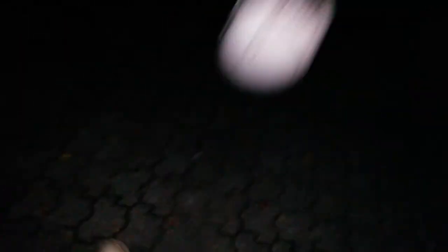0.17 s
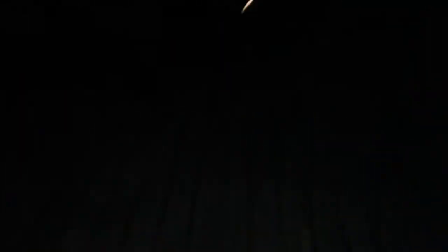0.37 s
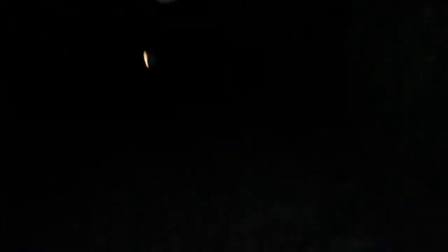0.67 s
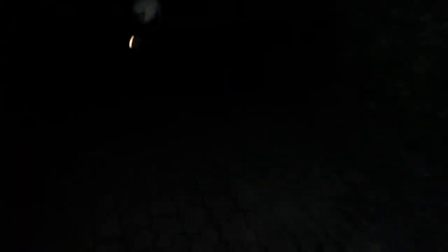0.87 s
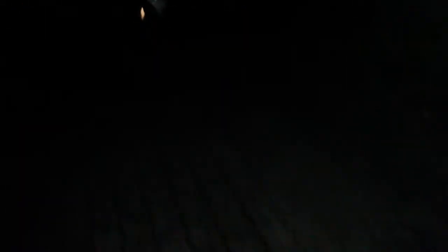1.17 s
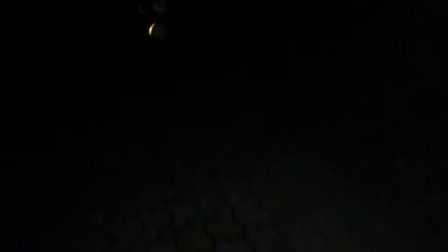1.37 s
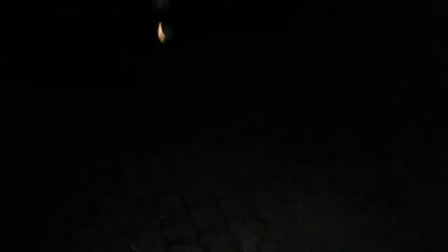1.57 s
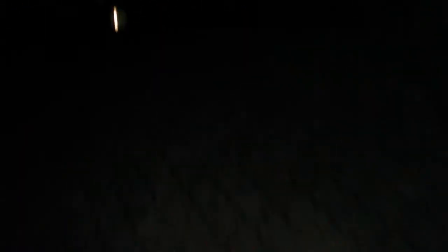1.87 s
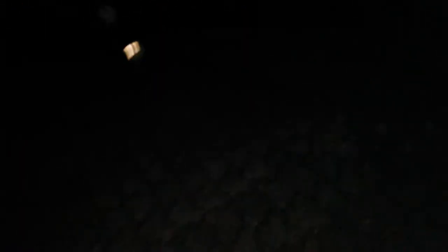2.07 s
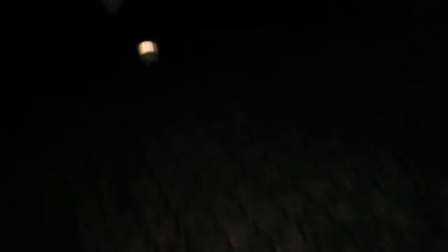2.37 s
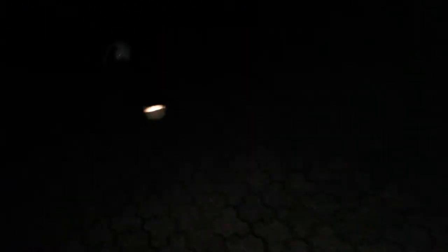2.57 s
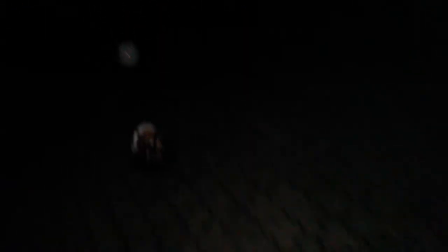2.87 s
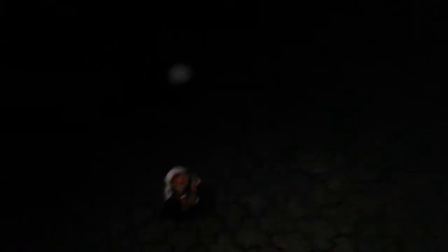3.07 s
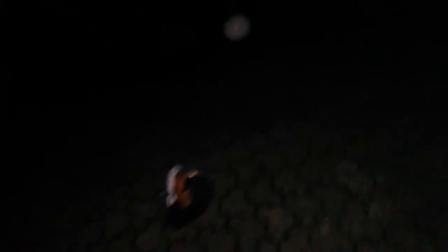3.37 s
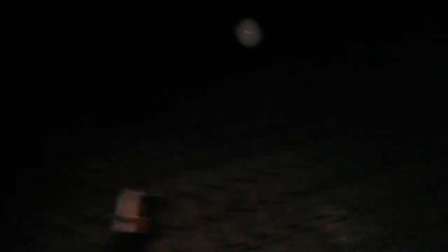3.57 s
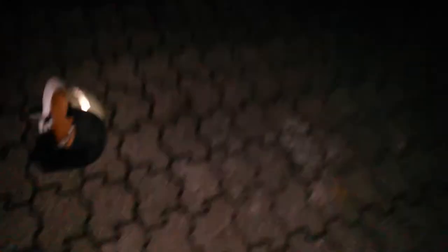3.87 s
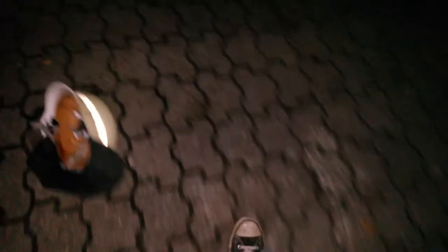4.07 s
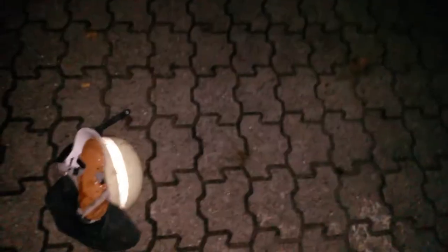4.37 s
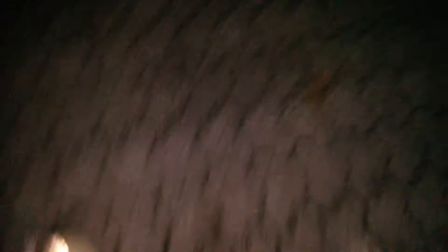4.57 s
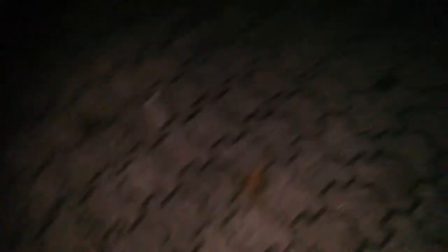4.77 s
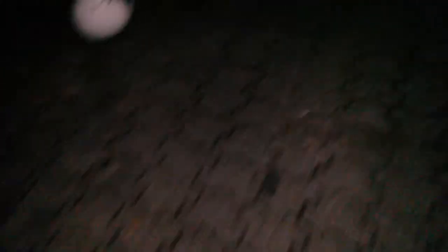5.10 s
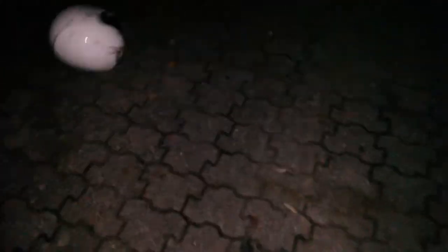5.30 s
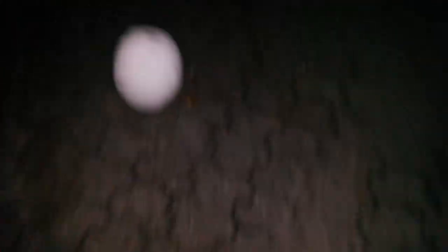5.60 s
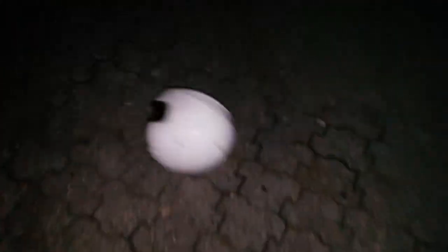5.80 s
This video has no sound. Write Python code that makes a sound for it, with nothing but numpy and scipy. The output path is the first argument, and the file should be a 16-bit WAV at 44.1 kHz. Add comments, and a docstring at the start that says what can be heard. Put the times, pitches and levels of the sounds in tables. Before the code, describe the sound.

Hollow hard-shell helmets are kicked over stone paving, knocking, clacking and crunching grit, with scuffing shoes and dry scrapes outdoors at close range.

```python
"""Helmets kicked over stone paving

Shoes and hard plastic shells strike stone close to a hand-held camera: decaying modes give thump and
knock, band-passed grit bursts give clack and crunch. Filtered grains make scuffs, slides and ticks.
A metal fitting rings twice as a sum of sines; air buffets the microphone as low noise.
A nearby wall slaps back as decaying noise; the right port is brighter, with a treble resonance."""
import sys
import numpy as np
from scipy import signal
from scipy.fft import rfft, irfft, next_fast_len
from scipy.io import wavfile
from scipy.ndimage import map_coordinates

SR = 44100
rng = np.random.default_rng(int(sys.argv[2]) if len(sys.argv) > 2 else 0)


def to_wav(sig):
    """Store sig (one row per channel, or 1-D mono) as 16-bit WAV at the path in sys.argv[1].

    Samples outside -1..1 are clipped; the rate is SR.
    """
    pcm = np.clip(np.atleast_2d(sig), -1, 1) * 32767
    pcm = np.round(pcm).astype(np.int16)
    wavfile.write(sys.argv[1], SR, pcm.T)  # frames by channels


N = 261954

# sliding and rolling of a shell: t/s, rumble level/dB, grit level/dB
SLIDE = [(0.0, -55, -33.5), (0.1, -69, -67), (0.86, -74, -77), (1.02, -58, -47.5), (1.21, -61.5, -53.5),
         (1.52, -69, -61.5), (1.7, -77, -65.5), (2.07, -62.5, -60), (2.55, -64, -53.5),
         (2.81, -55.5, -54.5), (3.14, -61.5, -55), (3.72, -59.5, -53), (4.5, -52, -47.5), (5.13, -53, -51),
         (5.43, -55.5, -52), (5.66, -59.5, -46), (5.82, -54, -38), (5.94, -63, -59)]
# air on the moving camera: t/s, level/dB
BUFFET = [(0, -44.5), (.5, -59.5), (3, -62.5), (3.7, -52.5), (5.94, -55)]
# short low swells, some giving the thumps their deepest boom: t/s, level/dB
SWELLS = [(.08, -43), (1.01, -56), (1.52, -56.5), (1.79, -50), (2.6, -61), (4.15, -51), (5.01, -38.5)]
# placed bumps over paver joints: t/s, level/dB
BUMPS = [(2.933, -47.5), (3.341, -47), (3.656, -45), (4.207, -48), (4.77, -43), (4.84, -44), (4.894, -41),
         (4.937, -36.5)]
# full blows of shoes and shells on stone: t/s, thump level/dB, knock level/dB, knock f/Hz,
# clack level/dB, clack f/Hz, grit level/dB, crunch t60/s
BLOWS = [(0.0198, -67, -39, 350, -48, 2400, -35.5, 0.043), (0.276, -55, -30, 551, -32, 1500, -21, 0.043),
         (0.3334, -47.5, -28.5, 724, -46, 1260, -45, .012),
         (0.8509, -40.5, -28, 496, -40, 2830, -35, 0.055), (0.9857, -30, -24, 460, -28.5, 3350, -19, 0.048),
         (1.2763, -42, -31, 413, -38, 1480, -23.5, 0.037),
         (1.7531, -33, -35.5, 443, -38.5, 1330, -41.5, 0.034),
         (1.774, -44, -45, 368, -42.5, 2450, -34, .026),
         (1.9335, -40, -32.5, 473, -36.5, 3270, -36.5, 0.034),
         (2.152, -38.5, -31, 938, -28.5, 3480, -29, 0.0059),
         (2.2854, -37.5, -42.5, 614, -41, 2880, -40.5, .009),
         (2.587, -34.5, -34.5, 545, -35.5, 1440, -31.5, 0.067),
         (2.6605, -62, -38, 476, -21, 1560, -21.5, 0.014), (2.718, -38.5, -25, 503, -30.5, 2300, -43, .011),
         (2.7482, -39, -32.5, 323, -28, 3500, -40.5, 0.012), (3.0923, -45, -43, 597, -54, 1740, -59, .03),
         (3.4132, -37, -32, 482, -32.5, 1950, -46, 0.012), (3.577, -44, -40.5, 685, -32, 3200, -31, 0.01),
         (3.8791, -47, -37, 323, -57, 1300, -43, .01), (4.1505, -46, -38, 328, -54, 1990, -59, .07),
         (4.2754, -40.5, -34.5, 303, -43.5, 1260, -48, 0.044),
         (4.3494, -54, -42, 654, -51, 1260, -52, 0.033), (4.371, -46, -52, 586, -40, 1260, -35, 0.066),
         (4.388, -44, -43.5, 593, -39.5, 1500, -31, 0.015),
         (4.5237, -40, -34.5, 814, -37.5, 1420, -43, 0.046),
         (4.5321, -40, -32.5, 1110, -31, 1500, -48, 0.053),
         (4.576, -38, -44, 317, -36.5, 1330, -24.5, 0.017), (4.6195, -41, -39, 575, -33, 1370, -42, 0.048),
         (4.6636, -35.5, -34, 373, -36, 3420, -38.5, .01),
         (4.6784, -35.5, -32.5, 330, -47, 1300, -42, 0.017),
         (5.1972, -41, -42, 566, -36, 1460, -32.5, 0.024), (5.2127, -45, -34, 776, -32, 1440, -52, 0.022),
         (5.2193, -40, -37, 307, -40.5, 3380, -36, .047), (5.277, -44, -44, 345, -49, 1370, -54, .1)]
# rim clacks of a tumbling shell: t/s, clack level/dB, clack f/Hz, grit level/dB
CLACKS = [(0.0546, -38.5, 1480, -31), (0.3761, -34, 2660, -31.5), (0.4027, -41, 1930, -40),
          (0.4314, -32, 2300, -29), (2.4404, -44, 1330, -54), (3.0392, -40.5, 2320, -40),
          (3.1777, -44.5, 1670, -47.5), (3.261, -55, 2970, -40), (3.4702, -52, 2570, -47),
          (3.5466, -43, 1810, -38.5), (3.8731, -38, 2750, -39), (4.984, -41.5, 2140, -39.5),
          (5.166, -40, 3070, -42), (5.3225, -37, 1720, -47), (5.6443, -42, 2490, -39.5),
          (5.8993, -24, 2650, -21)]
# placed single grains: t/s, level/dB
TICKS = [(0.0839, -44), (0.697, -54), (2.0597, -44), (2.0812, -42.5), (2.528, -46.5), (3.129, -44),
         (3.6437, -47.5), (5.469, -41.5)]
# short scuffs on the paving: t/s, rasp level/dB, hiss level/dB
SCUFFS = [(0.128, -35, -32), (1.012, -36.5, -40), (1.298, -36, -41), (1.492, -51, -42.5),
          (1.884, -65, -29.5), (2.151, -46, -31), (2.171, -30, -32), (2.687, -32.5, -27),
          (2.922, -43.5, -20.5), (3.348, -39.5, -24), (4.069, -39, -40), (4.47, -44, -50),
          (4.538, -36, -26.5), (5.02, -41, -48), (5.073, -55, -27.5), (5.732, -31.5, -21.5),
          (5.826, -38.5, -27.5), (5.926, -33, -44)]
# grit bursting under a shell or sole: t/s, crack level/dB, crack f/Hz
CRACKS = [(2.174, -33, 4200), (2.8508, -30.5, 4460), (2.956, -26.5, 5410), (4.0448, -38, 5770),
          (4.0942, -39, 3700), (4.113, -34, 3950), (4.7292, -29.5, 4220), (4.8585, -41, 5780),
          (5.0041, -42, 5160), (5.0463, -32.5, 4240), (5.0497, -24, 4330), (5.0925, -25, 3550),
          (5.1147, -38, 6280), (5.127, -32, 4980), (5.1401, -30.5, 4000), (5.8946, -25, 5940)]
# landings that ring the fitting: t/s, level/dB
RINGS = [(2.66, -26), (2.9569, -24.5)]
# modes of the metal fitting: f/Hz, level/dB, t60/s
FITTING = [(1475, -4, .08), (1560, -9, .05), (2681, 0, .115), (2770, -8, .06), (4829, -20, .08),
           (5110, -11, .06), (7036, -17, .08), (9250, -12, .1), (10600, -13, .12)]
# nominal modes of the hollow knock: frequency ratio, level/dB, cycles to fade by 60 dB
HOLLOW = [(.66, -16.5, 23), (1, -0.5, 21.5), (1.3, -3.5, 15), (1.66, -5.5, 20.5), (2.2, 2, 4.5)]
# nominal modes of the dull thump: f/Hz, level/dB, t60/s
THUMP = [(127, -8.5, 0.054), (183, -2.5, 0.041), (266.6, -0.5, 0.067)]
# filter spectra of rumble, rasp, hiss and air: f/Hz, gain/dB
RUMBLE = [(60, -30), (150, -2), (220, -4), (280, -2.5), (400, -7), (600, -7), (1000, -13.5), (1600, -27),
          (4000, -89)]
RASP = [(500, -17), (1100, 4.5), (1600, 4), (2200, 5), (3600, 4.5), (5500, 2.5), (7000, 4.5),
        (10000, -15.5)]
HISS = [(3500, -34.5), (7000, -5.5), (9000, -3.5), (12000, -6), (16000, 0.5)]
AIR = [(10, -19), (30, -9.5), (65, 1), (110, -4), (200, -15), (600, -29)]
# microphone port responses: f/Hz, gain/dB
LEFT_PORT = [(60, -2.5), (200, -1.5), (400, -7), (700, -5.5), (1300, -2.5), (2400, -4), (4400, -3.5),
             (6200, -2), (8500, -11.5), (10900, -12.5), (12500, -15.5), (15500, -16.5)]
RIGHT_PORT = [(60, 1), (7000, -0.5), (9300, 3), (10900, 12.5), (12500, 2.5), (14500, -4), (16000, -10)]
# decay of the yard's long tail: f/Hz, t60/s
YARD = [(100, 0.5), (400, 0.94), (1500, 0.84), (5000, 0.71), (11000, 0.58), (16000, 0.44)]

ROLL_DB, RASP_DB, HISS_DB = 4, -3, 2.5  # roll re rumble; rasp and hiss re grit
SWELL_HALF_S = 0.019
BUMPS_PER_S, BUMP_DB, BUMP_HZ = 9, 5, 275.6  # random bumps, dB re rumble; nominal pitch of all bumps
TICKS_PER_S, TICK_DB = 11, -4.5  # random grains, dB re grit
SCATTER_DB = 6.5  # size spread of random bumps and ticks: twice the logistic scale
CRACK_DB, CRACK_GRIT_SHARE = -1, 0.44  # offset; share of the way from clack level to grit level
RIM_KNOCK_HZ, RIM_KNOCK_DB, RIM_THUMP_DB = 694, -12.5, -20.5  # dB re clack
RIM_CRACK_DB, RIM_T60_S = -5.5, 0.024  # the light rim cracks the stone more softly
SCUFF_RISE_S, SCUFF_T60_S = 0.01, 0.062  # rise of 20 dB; fall of 60 dB
GRIT_SNAP_DB, GRIT_CLACK_DB, GRIT_KNOCK_DB, GRIT_THUMP_DB = 0.5, -16.5, -19, -24  # dB re crack
GRIT_HZ, GRIT_KNOCK_HZ, GRIT_CLACK_HZ, GRIT_T60_S = 4510, 380.5, 2540, 0.02
TOP_HZ = 16200


def amp(db):
    """Decibels to gain."""
    return 10 ** (np.asarray(db) / 20)


def unit(x):
    """Scale to rms 1."""
    return x / np.sqrt(np.mean(x ** 2) + 1e-20)


def pulse(x):
    """Scale to the energy of 10 ms at rms 1."""
    return x * np.sqrt(SR / 100 / (np.sum(x ** 2) + 1e-20))


def along(points, hz):
    """Interpolate (Hz, value) points on a log frequency axis."""
    f, v = np.transpose(points)
    return np.interp(np.log(hz + 1), np.log(f + 1), v)


def curves(rows):
    """One value per sample for each column after the time."""
    s, *cols = np.transpose(rows)
    return [np.interp(np.arange(N) / SR, s, c) for c in cols]


def wobble(knots_per_s):
    """Smooth random curve: a spline through normal draws."""
    knots = rng.standard_normal(int(N * knots_per_s / SR) + 4)
    return map_coordinates(knots, [np.arange(N) * knots_per_s / SR])


def colour(x, points):
    """Minimum-phase filter with the gain of (Hz, dB) points."""
    m = 2 * next_fast_len(len(x) // 2 + 4096)
    log_gain = np.log(amp(along(points, np.fft.rfftfreq(m, 1 / SR))))
    cepstrum = irfft(log_gain, m)
    # fold onto positive time: causal
    cepstrum[1:m // 2] *= 2
    cepstrum[m // 2 + 1:] = 0
    response = np.exp(rfft(cepstrum))
    return irfft(rfft(x, m) * response, m)[:len(x)]


def band(x, lo_hz, hi_hz, order=2):
    """Causal Butterworth band-pass."""
    edges_hz = np.clip(sorted([lo_hz, hi_hz]), 10, SR / 2 - 100)
    return signal.lfilter(*signal.butter(order, edges_hz, 'band', fs=SR), x)


def add(track, s, x):
    """Mix x into the track at time s."""
    i = max(0, round(s * SR))
    track[i:i + len(x)] += x[:max(0, len(track) - i)]


def late(x, s):
    """Delay by s seconds."""
    return np.pad(x, (max(0, round(s * SR)), 0))[:N]


def chance(rate_per_s, level_db):
    """(s, dB) of random small events whose size follows a level curve."""
    draws = rng.random((round(rate_per_s * N / SR), 2))
    return [(u * N / SR, level_db[int(u * N)] + SCATTER_DB * np.log(v / (1 - v)) / 2)
            for u, v in draws]


def grains(size, rate_per_s, spread_db):
    """Tiny slips of random size over a fine hiss, rms 1."""
    hits = rng.random(size) < rate_per_s / SR
    signs = rng.choice([-1, 1], size)
    sizes = amp(spread_db * np.minimum(rng.exponential(size=size), 4))
    return unit(unit(hits * signs * sizes) + 0.36 * rng.standard_normal(size))


def slide():
    """The shell chatters over rough pavers: grit rasps and the hollow rumbles."""
    rumble_db, grit_db = curves(SLIDE)
    chatter = wobble(70)
    grit = grains(N, rate_per_s=800, spread_db=3.5) * amp(3.5 * chatter)
    jolts = grains(N, rate_per_s=700, spread_db=4.0) * amp(2 * chatter)
    rumble = amp(rumble_db + ROLL_DB) * unit(colour(jolts, RUMBLE))
    rasp = amp(grit_db + RASP_DB) * unit(colour(grit, RASP))
    hiss = amp(grit_db + HISS_DB) * unit(colour(grit, HISS))
    return rumble + rasp + hiss


def buffet():
    """Air pushes on the two ports, partly in step; short low swells rise at times, and those under the thumps
    give them their deepest boom."""
    t, shared = np.arange(N) / SR, rng.standard_normal(N)
    ports = np.array([unit(colour(shared + rng.standard_normal(N), AIR)) for side in range(2)])
    swells = sum(amp(db) / (1 + ((t - s) / SWELL_HALF_S) ** 2) for s, db in SWELLS)
    push = amp(curves(BUFFET)[0]) + swells
    flutter = amp(3.6 * wobble(23))
    return ports * push * flutter * amp([[1.5], [-3.5]])  # left, right dB


def knock(t, hz):
    """The hollow body's modes: new strengths at every blow, each fading over a set count of cycles."""
    out = np.zeros(len(t))
    for k, (ratio, db, cycles) in enumerate(HOLLOW):
        fade = amp(db + rng.normal(0, 2.46) - 60 * t * hz * ratio / cycles)
        mode_hz = hz * ratio * rng.normal(1, 0.036)
        out += fade * (-1) ** k * np.sin(2 * np.pi * mode_hz * t)
    return out


def bumps():
    """Soft knocks as a shell rocks and rolls over the joints between pavers."""
    out, t = np.zeros(N), np.arange(SR // 8) / SR
    onset = 1 - np.exp(-t / 0.0024)
    for s, db in BUMPS + chance(BUMPS_PER_S, curves(SLIDE)[0] + BUMP_DB):
        add(out, s, amp(db) * pulse(knock(t, BUMP_HZ * rng.normal(1, 0.059)) * onset))
    return out


def thump(t):
    """The dull push of a weight landing: low modes with a soft onset."""
    modes = np.zeros(len(t))
    for k, (hz, db, t60_s) in enumerate(THUMP):
        fade = amp(db + rng.normal(0, 5.9) - 60 * t / t60_s)
        modes += fade * (-1) ** k * np.sin(2 * np.pi * hz * rng.normal(1, 0.08) * t)
    return pulse(modes * (1 - np.exp(-t / 0.0024)))


def crush(t, t60_s):
    """Grit breaks in a dense burst, over fainter, sparser skittering grains."""
    burst = amp(-60 * t / t60_s) * grains(len(t), rate_per_s=3400, spread_db=4.0)
    skitter = grains(len(t), rate_per_s=500, spread_db=5)
    return burst + amp(-27.0 - 60 * t / 0.077) * skitter


def contact(thump_db, knock_db, knock_hz, clack_db, clack_hz, crack_db, crack_hz, snap_db, t60_s):
    """One contact crushes grit and sets the hollow body knocking; one row per port."""
    t, ports = np.arange(SR // 7) / SR, []
    bite = 1 - np.exp(-(t / 0.0011) ** 2)  # the contact force builds up
    # the rough contact adds a broad thud around the knock's modes
    thud = band(bite * crush(t, t60_s=0.047), knock_hz * 0.48, 986)
    hollow = pulse(bite * knock(t, knock_hz)) + 0.64 * pulse(thud)
    body = amp(thump_db) * thump(t) + amp(knock_db) * pulse(hollow)
    shared = crush(t, t60_s)
    for side in range(2):
        crunch = bite * (shared + 0.39 * crush(t, t60_s))
        # two broad shell resonances, one set by the spot that is struck
        spot = pulse(band(crunch, clack_hz * 0.88, clack_hz * 1.2, order=1))
        shell = pulse(band(crunch, 1400, 4000, order=1))
        clack = pulse(band(spot + 0.6 * shell, 1300, 4400, order=3))
        narrow = pulse(band(crunch, crack_hz * 0.9, crack_hz * 0.96, order=1))
        broad = pulse(band(crunch, 2800, 7700, order=1))
        crack = pulse(band(narrow + broad, 3130, 8000))
        snap = pulse(band(crunch, 6980, 14400, order=3))
        ports.append(body + amp(clack_db) * clack - amp(crack_db) * crack + amp(snap_db) * snap)
    return ports


def placed(contacts):
    """Lay (s, pair of ports) contacts on a stereo track."""
    out = np.zeros((2, N))
    for s, (left, right) in contacts:
        add(out[0], s + rng.normal(-0.00017, 0.00005), left)  # the left port is farther away
        add(out[1], s - 0.0003, right)
    return out


def crack_level(clack_db, grit_db):
    """Crack level from a point between the clack's and the grit's, plus an offset."""
    return clack_db + CRACK_GRIT_SHARE * (grit_db - clack_db) + CRACK_DB


def crack_pitch():
    """Random crack pitch, drawn anew for each blow or clack."""
    return GRIT_HZ * np.exp(rng.normal(0, 0.15))


def blows():
    """A full blow thumps, knocks, clacks and crunches."""
    contacts = []
    for s, thump_db, knock_db, knock_hz, clack_db, clack_hz, grit_db, t60_s in BLOWS:
        crack_db = crack_level(clack_db, grit_db)
        contacts.append((s, contact(thump_db, knock_db, knock_hz, clack_db, clack_hz,
                                    crack_db, crack_pitch(), grit_db, t60_s)))
    return placed(contacts)


def clacks():
    """The stiff rim clacks and hardly moves the hollow body."""
    contacts = []
    for s, db, hz, grit_db in CLACKS:
        crack_db = crack_level(db, grit_db) + RIM_CRACK_DB
        contacts.append((s, contact(db + RIM_THUMP_DB, db + RIM_KNOCK_DB, RIM_KNOCK_HZ, db, hz,
                                    crack_db, crack_pitch(), grit_db, RIM_T60_S)))
    return placed(contacts)


def tick():
    """A tiny bright click of band-passed, decaying noise."""
    t = np.arange(SR // 50) / SR
    crack = rng.standard_normal(len(t)) * amp(-60 * t / 0.0075)
    return pulse(band(crack, 4700, 13600)) + amp(-13.5) * pulse(band(crack, 2200, 6700))


def ticks():
    """Single grains crack; the random ones are louder where the slide is gritty."""
    out = np.zeros(N)
    for s, db in TICKS + chance(TICKS_PER_S, curves(SLIDE)[1] + TICK_DB):
        add(out, s, amp(db) * tick())
    return out


def scuffs():
    """Short rubs swell and die away in a spray of grit."""
    t, rasp, hiss = np.arange(N) / SR, np.zeros(N), np.zeros(N)
    for s, rasp_db, hiss_db in SCUFFS:
        rise_db = -20 * np.maximum(s - t, 0) / SCUFF_RISE_S
        fall_db = -60 * np.maximum(t - s, 0) / SCUFF_T60_S
        stroke = amp(rise_db + fall_db)
        rasp += amp(rasp_db) * stroke
        hiss += amp(hiss_db) * stroke
    grit = grains(N, rate_per_s=3300, spread_db=3.0)
    return rasp * unit(colour(grit, RASP)) + hiss * unit(colour(grit, HISS))


def cracks():
    """Bursting grit is nearly all treble, with a faint knock of the shell above it."""
    contacts = []
    for s, db, hz in CRACKS:
        contacts.append((s, contact(db + GRIT_THUMP_DB, db + GRIT_KNOCK_DB, GRIT_KNOCK_HZ,
                                    db + GRIT_CLACK_DB, GRIT_CLACK_HZ,
                                    db, hz, db + GRIT_SNAP_DB, GRIT_T60_S)))
    return placed(contacts)


def fitting():
    """A small metal part rings in decaying sine modes when its helmet lands."""
    out, t = np.zeros(N), np.arange(SR // 2) / SR
    ring = sum(amp(db - 60 * t / t60_s) * np.sin(2 * np.pi * hz * t) for hz, db, t60_s in FITTING)
    for s, db in RINGS:
        add(out, s, amp(db) * ring)
    return out


def yard(x, wall_s, wall_db, near_db, tail_db, count=16):
    """Wall slap, ground scatter and faint tail, with fresh random noise for each of count stretches."""
    out, t = np.zeros(N), np.arange(SR) / SR
    for part in np.array_split(np.arange(N), count):
        hz, age_s, z = signal.stft(rng.standard_normal(SR), SR, nperseg=256)
        decay = amp(-60 * age_s / along(YARD, hz)[:, None])
        tail = signal.istft(z * decay, SR, nperseg=256)[1][:SR] * (1 - np.exp(-t / 0.0079))
        near = rng.standard_normal(SR) * amp(-60 * t / 0.065) * (1 - np.exp(-t / 0.00023))
        wall = rng.standard_normal(SR) * amp(-60 * t / 0.081)
        answer = amp(tail_db) * tail / np.linalg.norm(tail) + amp(near_db) * near / np.linalg.norm(near)
        slap = amp(wall_db) * wall / np.linalg.norm(wall)
        add(answer, wall_s + rng.normal(0, 0.00099), slap)
        add(out, part[0] / SR, signal.fftconvolve(x[part], answer))
    return out


def scene():
    """The action lies to the right, so the left port hears it a moment later."""
    small = ticks() + fitting() + scuffs() + bumps()
    strikes = blows() + clacks() + cracks() + np.array([late(small, 0.00015), small])
    rubbing = slide()
    left = 0.61 * late(rubbing, 0.00012) + 0.69 * slide()  # partly independent of the right
    echoes = np.array([yard(port, wall_s=0.0235, wall_db=-12, near_db=-14.5, tail_db=-17.0)
                       for port in strikes])
    return strikes + np.array([left, rubbing]) + echoes + buffet()


def record(dry):
    """Each port colours the sound; the camera rounds off the highest peaks and limits the band."""
    x = np.array([colour(dry[0], LEFT_PORT), colour(dry[1], RIGHT_PORT)])
    x = x / (1 + np.abs(x) ** 6) ** (1 / 6)
    return signal.sosfilt(signal.ellip(10, 0.1, 80, TOP_HZ, fs=SR, output='sos'), x)


dry = scene()
out = record(dry)
to_wav(out)
```